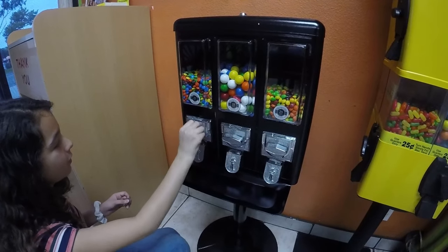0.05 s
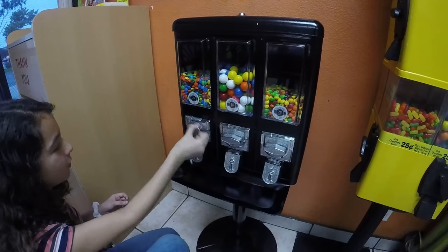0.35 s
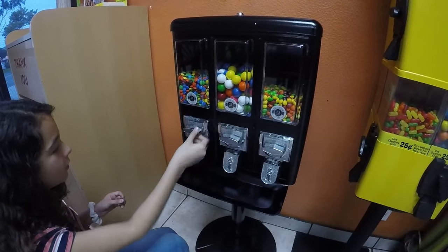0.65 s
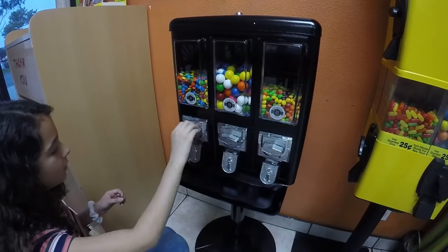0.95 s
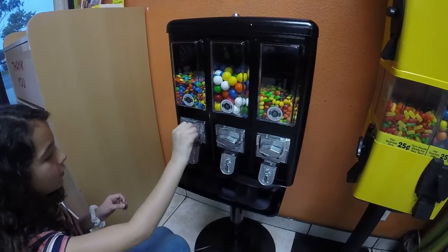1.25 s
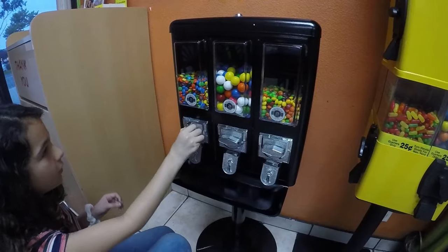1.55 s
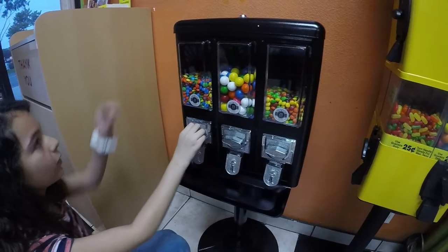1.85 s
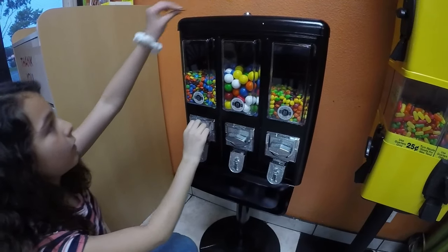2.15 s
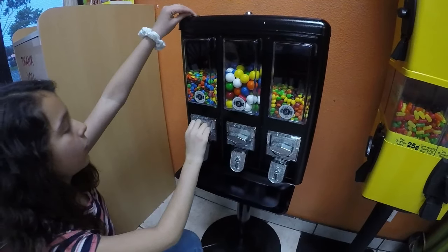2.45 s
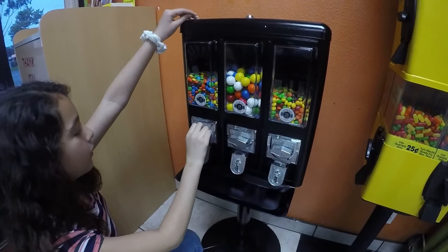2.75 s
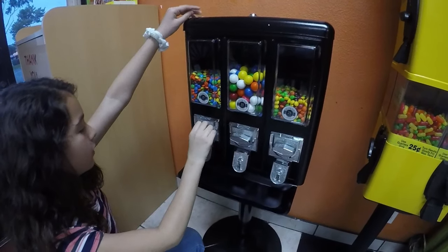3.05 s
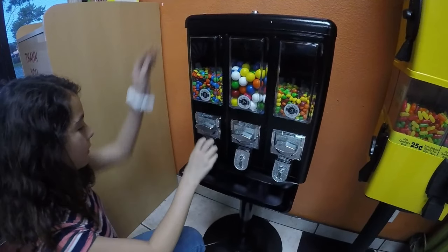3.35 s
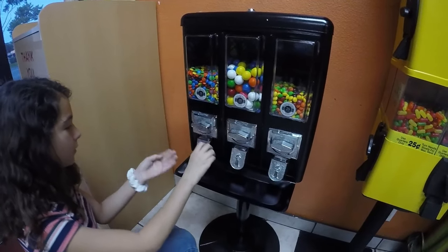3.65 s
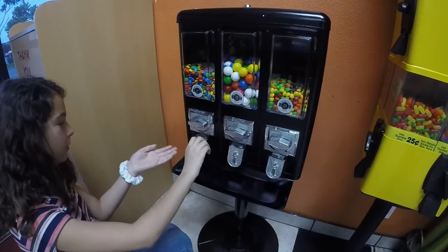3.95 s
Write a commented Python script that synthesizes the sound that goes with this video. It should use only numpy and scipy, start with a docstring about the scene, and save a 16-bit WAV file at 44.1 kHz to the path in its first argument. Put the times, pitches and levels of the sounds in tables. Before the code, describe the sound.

A candy dispenser's metal knob ratchets with quick clacks for the first 0.7 seconds, while hard sweets rattle inside and the cabinet knocks and grinds. Faint ticks and short scrapes follow around 1.3 and 1.8 seconds. The catch snaps sharply at about 2.3 and 2.5 seconds, and a last soft scrape with ticks comes near 3.3. A steady compressor hum and low room rumble run underneath throughout.

```python
"""A ratchet clacks as the metal knob of a coin-operated candy dispenser is turned.
Sweets churn in the hopper, the wheel grinds, small parts ping and the cabinet knocks.
The knob is then nudged: short scrapes, light ticks, two sharp snaps of the catch.
Contacts are decaying noise and struck modes; churn and friction are dense random contacts.
A compressor hums over the low rumble of a small shop."""
import sys
import numpy as np
from scipy import signal
from scipy.fft import rfft, irfft
from scipy.io import wavfile

SR = 44100
rng = np.random.default_rng(int(sys.argv[2]) if len(sys.argv) > 2 else 0)


def put_to_file(sound):
    """Save the sound as 16-bit audio at rate SR, in the file named by the first command-line argument."""
    columns = np.atleast_2d(sound).T  # one column per channel
    safe = np.clip(columns, -1, 1)
    whole_steps = np.round(safe * 32767)
    wavfile.write(sys.argv[1], SR, whole_steps.astype(np.int16))


N = 176400
T = np.arange(N) / SR
AGE = T[:SR * 3 // 4]  # seconds since a contact


# ratchet clacks: start_s, level_db
CLACKS = [(0.0205, -14), (0.0657, -14.5), (0.1545, -18), (0.1725, -13), (0.2009, -21), (0.2194, -19.5),
          (0.2518, -13.5), (0.2758, -23), (0.2947, -17.5), (0.3391, -21), (0.3636, -14.5), (0.3895, -18.5),
          (0.4199, -19), (0.4385, -19), (0.5102, -17), (0.5671, -16.5), (0.615, -29), (0.6355, -28),
          (0.6494, -28), (0.7013, -25)]
# clack spectrum: freq_hz, density_db
CLACK_SPECTRUM = [(500, -10), (830, -3.5), (1150, -5.5), (1600, -8), (2400, -1.5), (3200, -14), (4500, -1),
                  (5700, -6.5), (7000, -5), (8300, -9.5), (11000, -19.5), (15000, -27)]
# coin mechanism modes: pitch_hz, level_db, t60_s
METAL_MODES = [(2239, -10, .22), (2826, -9, .21), (3314, 0, .18), (3526, -6, .2), (4190, 0, .2),
               (4500, 0, .19), (4660, -3, .19), (4925, -2, .21), (5180, -6, .27), (5636, -8, .24),
               (6045, -11, .28), (6643, -9, .25), (7370, -4, .19), (8500, -7, .12)]

def ratchet(crack_s=0.006):
    """Each clack starts with a crack and rings the metal."""
    crack = 1 + np.exp(-(AGE / crack_s) ** 2)
    out = 0
    for start_s, level_db in CLACKS:
        hit = from_db(-5) * crack * contact(CLACK_SPECTRUM, t60_s=0.13)
        metal = from_db(-19.5) * ring(METAL_MODES)
        out += from_db(level_db) * at(start_s, hit + metal)
    return out


# churn envelope: time_s, level_db
CHURN_ENVELOPE = [(0, -40), (.015, -24), (.045, -28.5), (.08, -27), (.135, -38), (.16, -24), (.23, -21.5),
                  (.33, -25.5), (.44, -16.5), (.49, -22), (.53, -20), (.6, -28), (.69, -33.5), (.73, -48),
                  (.78, -58)]
# sweet contact spectrum: freq_hz, density_db
SWEET_SPECTRUM = [(600, -35.5), (1100, -4.5), (1600, 5), (2300, -2.5), (3100, -2.5), (4400, 4),
                  (5700, -1.5), (6800, 2.5), (8300, -6.5), (10000, -10.5), (12000, -25), (15000, -38)]
# hopper and wheel modes: pitch_hz, level_db, t60_s
HOPPER_MODES = [(834, -5, .08), (1414, -4, .16), (1594, 0, .16), (1700, -5, .08), (2400, -3, .08),
                (2790, -7, .15), (2942, -6, .15), (3380, -5, .1), (4097, -1, .14), (4280, -2, .14),
                (4540, 3, .12), (4690, 1, .11), (5154, -3, .16), (6770, 0, .11), (8586, -12, .3)]

def sweets(shell_cycles=160):
    """Hard sweets tumble against the hopper, each contact with a brief pitch of its own."""
    responses = []
    for shell_hz in np.geomspace(2400, 8000, 10):
        hit = contact(SWEET_SPECTRUM, t60_s=0.068)
        hopper = from_db(-16) * ring(HOPPER_MODES)
        shell = ring([(shell_hz, -3, shell_cycles / shell_hz)])
        responses.append(hit + hopper + shell)
    return from_db(-9.5) * rattle(envelope(CHURN_ENVELOPE), responses, per_s=750, spread_db=2.5)


# cabinet knocks: start_s, level_db
KNOCKS = [(0.021, -13.5), (0.047, -14.5), (.175, -14.5), (0.253, -12.5), (0.293, -22), (.325, -14),
          (0.394, -19), (.42, -13), (.668, -15)]
# cabinet modes: pitch_hz, level_db, t60_s
CABINET_MODES = [(184, -1.5, 0.2), (211, -3, 0.14), (265, -2.5, .13), (382, -13, .1), (548, -5.5, 0.1),
                 (847, -13.5, 0.11)]

def cabinet(attack_s=0.0014):
    """The housing gives soft, hollow knocks under strain."""
    return sum(from_db(level_db) * at(start_s, onset(attack_s) * ring(CABINET_MODES))
               for start_s, level_db in KNOCKS)


# wheel friction envelope: time_s, level_db
GRIND_ENVELOPE = [(0, -61), (.07, -27), (.13, -39), (.22, -56), (.29, -24.5), (.34, -41), (.39, -25.5),
                  (.44, -22.5), (.48, -48), (.64, -51), (.68, -26.5), (.73, -49), (.78, -47)]

def wheel():
    """The dispensing wheel grinds against the cabinet."""
    return grinding(envelope(GRIND_ENVELOPE))


# cabinet friction spectrum: freq_hz, density_db
GRIND_SPECTRUM = [(150, -15.5), (300, 9), (520, 4.5), (800, 2.5), (1100, -7.5), (1500, -7.5), (2500, -12.5),
                  (5000, -23.5)]

def grinding(gain):
    """Dull slips passed on to the cabinet."""
    responses = [contact(GRIND_SPECTRUM, t60_s=0.083, attack_s=0.0014) for _ in range(3)]
    return rattle(gain, responses, per_s=810, spread_db=-0.5)


# small-part pings: start_s, pitch_hz, level_db, t60_s
PINGS = [(.013, 4170, -18, .08), (.154, 1660, -16, .11), (.294, 8590, -28, .22), (.53, 1897, -22.5, .35),
         (.668, 8590, -37, .3), (.668, 13950, -48, .18)]

def pings(attack_s=0.0005):
    """Small metal parts ring with one partial each."""
    out = 0
    for start_s, pitch_hz, level_db, t60_s in PINGS:
        partial = np.sin(2 * np.pi * pitch_hz * AGE) * decay(t60_s)
        out += from_db(level_db) * at(start_s, onset(attack_s) * partial)
    return out


# catch snaps: start_s, level_db
SNAPS = [(2.2811, -25), (2.4727, -19.5)]
# snap spectrum: freq_hz, density_db
SNAP_SPECTRUM = [(900, -11), (2200, 1.5), (2900, -0.5), (4400, 3.5), (5700, 0), (7300, 2), (8600, -4.5),
                 (10500, -20), (15000, -32)]
# slide spectrum: freq_hz, density_db
SLIDE_SPECTRUM = [(1500, -11), (3500, -16), (4500, -2), (5600, -20), (7400, -32), (8500, -14), (10500, -33),
                  (15000, -42)]

def snaps(slide_s=0.02, slide_rise_db=21.5, echo_s=0.008):
    """The catch slides with a rising hiss and snaps home; a weaker echo of the snap follows a few ms later."""
    out = 0
    for start_s, level_db in SNAPS:
        swell = from_db(-5 - slide_rise_db * np.abs(T - start_s) / slide_s) * (T < start_s)
        slide = swell * noise(SLIDE_SPECTRUM, N)
        hit = from_db(1) * contact(SNAP_SPECTRUM, t60_s=0.13)
        echo = from_db(-6.5) * contact(SNAP_SPECTRUM, t60_s=0.13)
        metal = from_db(-10) * ring(METAL_MODES)
        out += from_db(level_db) * (slide + at(start_s, hit + metal) + at(start_s + echo_s, echo))
    return out


# knob scrapes: peak_s, rise_s, fall_s, level_db, cabinet_offset_db
SCRAPES = [(1.243, 0.076, 0.029, -38.5, 7), (1.291, 0.058, 0.036, -42, 5.5),
           (1.811, 0.082, 0.049, -38, 6.5), (3.324, 0.086, 0.031, -35.5, 10.5)]
# scrape spectrum: freq_hz, density_db
SCRAPE_SPECTRUM = [(600, 19), (1200, -23), (2100, 4), (2800, -1.5), (3700, 9.5), (5300, -4), (6400, -1),
                   (8500, -9), (11000, -22.5), (15000, -36.5)]

def scrapes(fade_db=28.5):
    """Short swells of stick-slip friction in the knob also drive the cabinet."""
    knob_gain = cabinet_gain = 0
    for peak_s, rise_s, fall_s, level_db, cabinet_offset_db in SCRAPES:
        off_peak = np.maximum((peak_s - T) / rise_s, (T - peak_s) / fall_s)
        swell = from_db(level_db - fade_db * off_peak)
        knob_gain += swell
        cabinet_gain += swell * from_db(cabinet_offset_db)
    responses = [contact(SCRAPE_SPECTRUM, t60_s=0.034) for _ in range(3)]
    return rattle(knob_gain, responses, per_s=2400, spread_db=-0.5) + grinding(cabinet_gain)


# knob ticks: start_s, level_db
TICKS = [(0.833, -40.5), (1.347, -44), (1.396, -42), (1.457, -46), (1.754, -38.5), (1.779, -60),
         (1.818, -32), (1.844, -38), (2.929, -47.5), (3.279, -36.5), (3.296, -37), (3.319, -38)]
# tick spectrum: freq_hz, density_db
TICK_SPECTRUM = [(900, -1), (2500, -3), (3800, 0.5), (5200, -6), (6400, -6.5), (8000, -19.5), (10500, -16),
                 (12000, -36.5), (15000, -28.5)]

def ticks():
    """Light taps from play in the knob."""
    return sum(from_db(level_db) * at(start_s, contact(TICK_SPECTRUM, t60_s=0.065, attack_s=0.00023))
               for start_s, level_db in TICKS)


# compressor and mains partials: pitch_hz, rms_db
HUM = [(58.3, -27.5), (116.6, -33.5), (120, -35), (174.9, -29), (233.2, -25.5), (289, -41.5), (466.4, -55),
       (524.7, -43), (758.5, -53.5), (826, -59), (852, -49.5), (933, -66.5)]

def hum(waver_rad=0.15, waver_hz=5.3):
    """Compressor and mains tones, each wavering slightly in phase."""
    out = 0
    for pitch_hz, rms_db in HUM:
        waver = waver_rad * noise([(waver_hz / 2, 0), (waver_hz, -6)], N)
        phase = 2 * np.pi * (pitch_hz * T + rng.random()) + waver
        out += np.sqrt(2) * from_db(rms_db) * np.sin(phase)
    return out


# ventilation spectrum: freq_hz, density_db
RUMBLE_SPECTRUM = [(20, -3.5), (33, -1), (42, 1), (55, -11), (82, 0), (100, -8.5), (135, -1), (165, -1),
                   (210, -4), (256, -8.5), (305, -16), (360, -11.5), (440, -15.5), (620, -18), (850, -24.5),
                   (1240, -33), (1990, -36.5), (2770, -44), (3700, -44.5), (5380, -52.5), (8000, -55),
                   (10000, -55), (11500, -64.5), (15000, -71)]

def ventilation(rms_db=-25):
    """Steady low rumble of the shop's air."""
    return from_db(rms_db) * noise(RUMBLE_SPECTRUM, N)


def contact(spectrum, t60_s, attack_s=0.0001):
    """One contact: the dense ring of the body and a duller room tail."""
    body = noise(spectrum, len(AGE)) * decay(t60_s)
    lowpass = signal.butter(1, 7350, fs=SR, output="sos")
    room = signal.sosfilt(lowpass, noise(spectrum, len(AGE))) * decay(t60_s=0.82)
    return onset(attack_s) * (body + from_db(-23.5) * room)


def ring(modes, spread_db=2):
    """Struck modes with random strength and sign."""
    out = 0
    for pitch_hz, level_db, t60_s in modes:
        gain = from_db(level_db + spread_db * rng.normal()) * rng.choice([-1, 1])
        out += gain * np.sin(2 * np.pi * pitch_hz * AGE) * decay(t60_s)
    return out


def rattle(gain, responses, per_s, spread_db):
    """Random impulses shared among contact points; rms follows gain."""
    out = 0
    for response in responses:
        sizes = from_db(spread_db * np.minimum(rng.exponential(1, N), 3))
        signs = rng.choice([-1, 1], N)
        struck = rng.random(N) < per_s / len(responses) / SR
        impulses = gain * unit_rms(sizes * signs * struck)
        out += signal.fftconvolve(impulses, response / np.linalg.norm(response))[:N]
    return out


def noise(spectrum, size):
    """Unit-rms shaped noise, falling steeply beyond the spectrum's ends."""
    freq_hz, density_db = np.transpose(spectrum)
    bin_hz = np.maximum(np.arange(size // 2 + 1) * SR / size, 1)
    skirts = (np.minimum(bin_hz / freq_hz[0], 1) * np.minimum(freq_hz[-1] / bin_hz, 1)) ** 3
    shape = from_db(np.interp(np.log(bin_hz), np.log(freq_hz), density_db))
    return unit_rms(irfft(rfft(rng.standard_normal(size)) * skirts * shape, size))


def envelope(points):
    """Gain along a level curve, silent after its end."""
    time_s, level_db = np.transpose(points)
    return from_db(np.interp(T, time_s, level_db)) * (T < time_s[-1])


def onset(attack_s):
    """Smooth rise from 0 to 1."""
    return (1 - np.exp(-AGE / attack_s)) ** 2


def decay(t60_s):
    """Exponential decay from 1."""
    return np.exp(-np.log(1000) * AGE / t60_s)


def at(start_s, sound):
    """Place a sound on the timeline."""
    return np.pad(sound, (int(start_s * SR), N))[:N]


def from_db(db):
    """Decibels to gain."""
    return 10 ** (np.asarray(db) / 20)


def unit_rms(x):
    """Scale to unit rms."""
    return x / np.sqrt(np.mean(x ** 2) + 1e-20)


def scene(wide_above_hz=12200, side_lag_s=0.00072):
    """Centred mix with some width in the top treble."""
    turn = ratchet() + sweets() + cabinet() + wheel() + pings()
    nudges = snaps() + scrapes() + ticks()
    mid = turn + nudges + hum() + ventilation()
    treble = signal.sosfilt(signal.butter(10, wide_above_hz, "high", fs=SR, output="sos"), mid)
    side = from_db(-3) * at(side_lag_s, treble)
    return np.array([mid + side, mid - side])


def record(dry):
    """Soft peak limit, then a steep low-pass."""
    ceiling, cutoff_hz = 0.9, 15200
    limited = dry / (1 + (dry / ceiling) ** 6) ** (1 / 6)
    return signal.sosfilt(signal.ellip(10, 0.1, 80, cutoff_hz, fs=SR, output="sos"), limited)


dry = scene()
out = record(dry)
put_to_file(out)
```